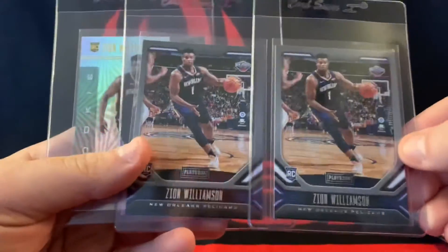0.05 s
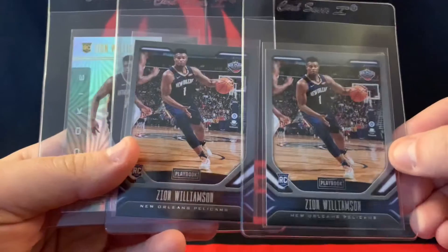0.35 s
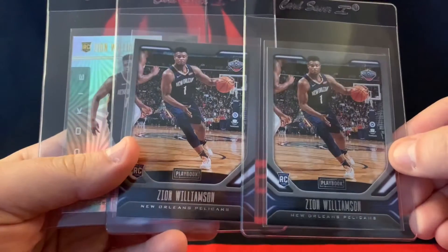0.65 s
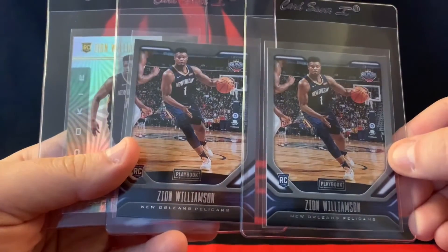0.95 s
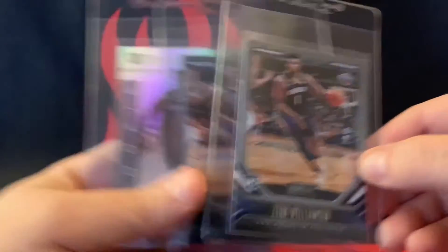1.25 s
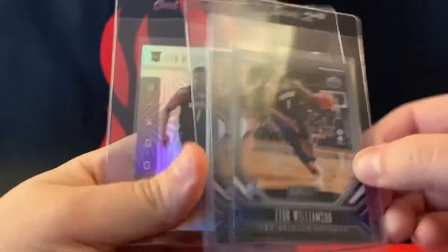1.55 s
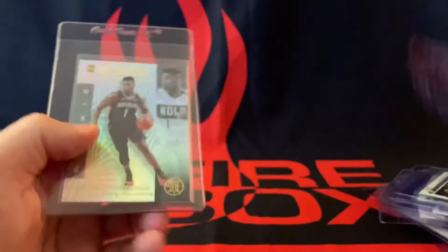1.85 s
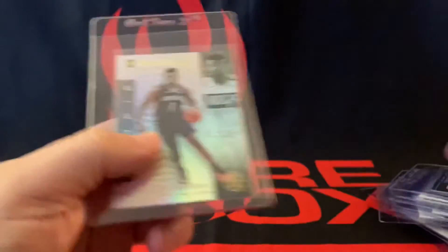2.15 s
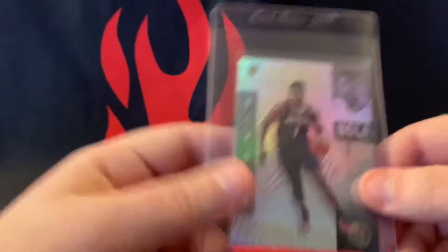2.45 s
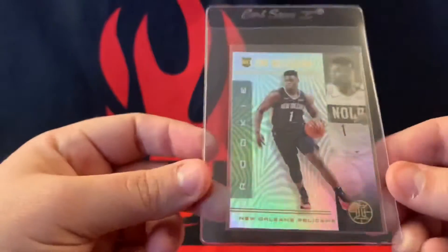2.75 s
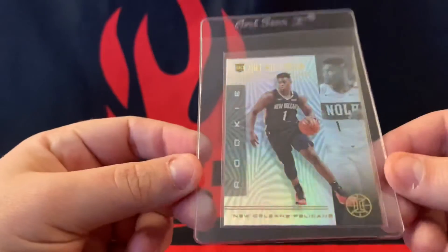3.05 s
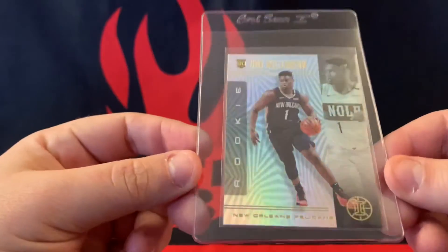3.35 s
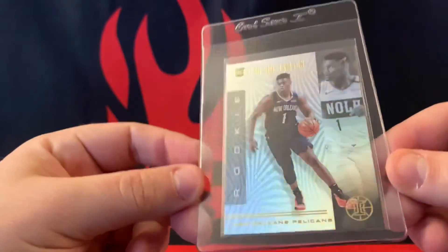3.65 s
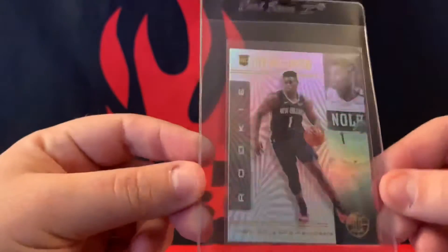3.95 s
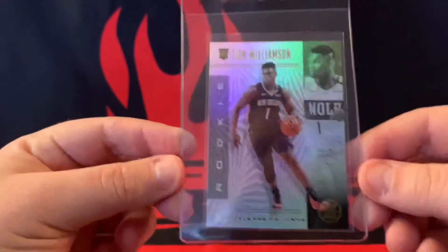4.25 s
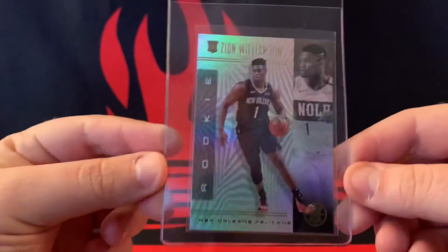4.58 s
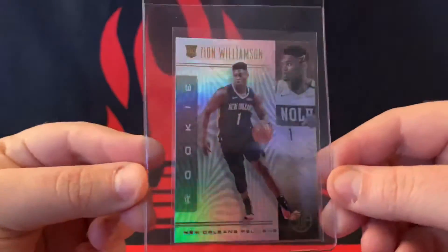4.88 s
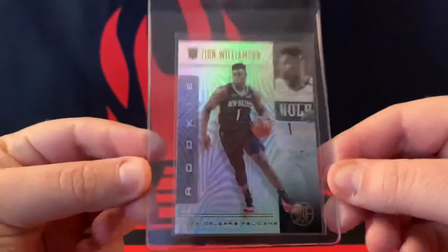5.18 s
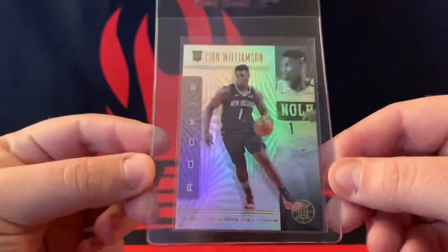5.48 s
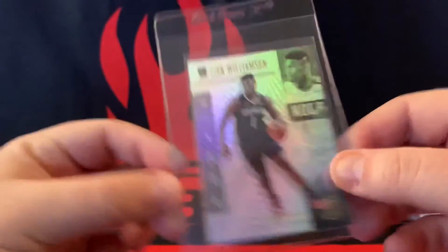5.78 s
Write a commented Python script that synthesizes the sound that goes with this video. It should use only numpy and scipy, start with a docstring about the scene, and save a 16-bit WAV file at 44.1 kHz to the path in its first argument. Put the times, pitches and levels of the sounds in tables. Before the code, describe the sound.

A steady low hum and fan rush fill a small room. Close up, plastic card sleeves rub and click against each other, with one sharp snap, a dry tap and a heavy, dull bump on the desk. The handling then grows quiet, leaving soft groans and rumbles of arms shifting on the desk that carries the microphone, and a last short cluster of plastic clicks.

```python
"""At a desk in a small room, bendy plastic card holders are slid apart, snapped free and turned over
just in front of a phone. The sleeves hiss as they rub, tick as their edges catch and knock as they
buckle; the spare ones are set down with a tap. Forearms bump, drag and creep on the desk that carries
the phone, making it thud, rumble and groan. A fan and mains hum fill the room throughout."""
import sys
import numpy as np
from scipy import signal
from scipy.fft import rfft, irfft
from scipy.io import wavfile
from scipy.ndimage import uniform_filter1d

SR = 44100
rng = np.random.default_rng(int(sys.argv[2]) if len(sys.argv) > 2 else 0)


def digitize_waveform(pressure):
    """Quantize a signal to 16-bit integers and store it at the path in sys.argv[1].

    Rows of a 2-D input are taken as channels; values are limited to [-1, 1].
    """
    field = np.atleast_2d(pressure).T
    bounded = np.clip(field, -1, 1)
    quanta = np.round(bounded * 32767).astype(np.int16)
    wavfile.write(sys.argv[1], SR, quanta)


N = 256662
TIME, FREQ = np.arange(N) / SR, np.fft.rfftfreq(N, 1 / SR)

# mains and fan tones: (pitch [Hz], level [dB], waver [0-1])
HUM_TONES = [(118.6, -59, 0.62), (200.6, -56.5, 0.95), (240.4, -50.5, 0.42), (324.5, -64.5, .8),
             (362.7, -65.5, 0.3), (407, -66, 0.4), (511.5, -73, 1), (592, -75.5, 0.8), (723.7, -75, 1),
             (808, -80.5, 0.7), (888, -82.5, 0.87), (1058, -78.5, 0.83), (1188, -84, 0.97)]
# the fan's rush, shared by both microphones and differing between them: (frequency [Hz], level [dB])
RUSH_SHARED_COLOUR = [(25, -33), (45, 5), (100, -6), (170, -4), (250, -3.5), (420, -9), (640, -16.5),
                      (900, -23), (1150, -21.5), (1700, -32.5), (2500, -37), (4200, -46.5), (7000, -56.5),
                      (12000, -52.5), (15500, -62.5)]
RUSH_SIDE_COLOUR = [(25, -28.5), (50, -4), (200, -7), (330, -2.5), (450, -7.5), (750, -3), (1200, -10.5),
                    (1700, -16.5), (2400, -24.5), (4200, -37.5), (7000, -42), (15500, -43.5)]
# the fan's whirr: (frequency [Hz], level [dB])
WHIRR_COLOUR = [(1800, -32.5), (2600, -7.5), (3000, -2.5), (3350, -8), (3550, -20), (3900, -16.5),
                (7000, -40)]
# a thin whistle on top of the whirr: (time [s], length [s], level [dB])
FAN_WHISTLES = [(2.5, 0.26, -73), (5.33, .32, -76)]

# forearms bumping the desk: (time [s], level [dB], contact time [s])
ARM_BUMPS = [(0.824, -33.5, 0.016), (1.834, -24, 0.012), (1.855, -27, 0.0069), (2.383, -17.5, 0.0075),
             (2.399, -16.5, 0.004), (2.425, -21.5, 0.0083), (2.916, -38.5, 0.0021), (2.992, -29, 0.0056),
             (3.023, -39.5, 0.0088), (3.612, -35, 0.0017), (4.147, -30.5, 0.00092), (4.42, -32, 0.011),
             (4.933, -33, 0.0051)]
# forearms leaning and dragging: (time [s], length [s], sway level [dB], drag level [dB])
ARM_LEANS = [(.82, 0.061, -34, -45), (1.365, 0.012, -33, -42), (1.835, 0.058, -29, -32.5),
             (2.04, 0.17, -44, -45), (2.392, 0.022, -23, -27.5), (2.47, 0.051, -26.5, -36.5),
             (2.565, 0.021, -50, -39.5), (2.69, 0.23, -48.5, -46), (3.02, 0.17, -35.5, -41),
             (3.605, 0.035, -35, -34.5), (4.23, 0.092, -31.5, -47.5), (4.42, 0.083, -32.5, -40.5),
             (4.9, 0.1, -32, -39.5), (5.15, 0.1, -32.5, -62), (5.53, 0.052, -36.5, -38),
             (5.69, 0.018, -48, -45)]
# modes (natural notes) of desk and phone stand, bumped or rocked: (pitch [Hz], level [dB], ring time [s])
DESK_MODES = [(51, -6, 0.18), (78, -1.5, 0.11), (116.9, -6.5, 0.25), (152.6, -9.5, 0.45),
              (203.3, -0.5, 0.16), (227.1, -1.5, 0.28), (301, -4.5, 0.065), (360.7, -6, 0.097),
              (393, -21, 0.071)]
SWAY_MODES = [(45.3, -6.5, 0.71), (74.4, -4.5, 0.084)]
# an arm dragging on the desk: (frequency [Hz], level [dB])
ARM_DRAG_COLOUR = [(60, -20.5), (100, -6.5), (120, 5), (140, -3.5), (165, 0), (190, -18), (260, -14),
                   (380, -18), (600, -35), (1500, -43), (6000, -77.5)]

# strokes of sleeve over sleeve: (time [s], length [s], hiss level [dB], treble tilt [dB per octave],
# rub and crackle level [dB], sleeve resonance [Hz], resonance boost [dB])
SLEEVE_STROKES = [(1.148, 0.069, -54, -4.5, -68, 9300, -5), (1.329, 0.016, -59, -16, -66, 7600, -2),
                  (1.45, 0.03, -64.5, -8, -61.5, 5900, 0), (1.549, .053, -58.5, -9.5, -61, 4650, 11),
                  (1.645, 0.11, -72.5, 12, -78, 7040, 0), (1.859, 0.051, -57, -6, -55.5, 10000, -6),
                  (2.09, 0.093, -63, 7, -65, 8800, -1), (2.189, 0.044, -82, -4, -69, 6700, 3),
                  (2.286, 0.081, -70, -3, -65.5, 15000, 10), (2.44, 0.029, -61, -4.5, -63.5, 9100, -5),
                  (2.594, 0.025, -65, -10, -67.5, 7000, 9), (2.768, 0.031, -67, -4, -68.5, 9200, -1),
                  (2.888, 0.044, -82, 3, -76, 10500, 10.5), (3.057, 0.031, -82, 2.5, -79, 10600, 7),
                  (3.589, .026, -82, 4, -68, 5030, 4), (5.699, .0061, -65, -9, -66, 6100, 3),
                  (5.772, .04, -80, -4, -70, 6000, 7)]
# sliding plastic, rubbing thumbs and catching scratches: (frequency [Hz], level [dB])
HISS_COLOUR = [(600, -21), (2500, -16), (4000, -10), (5500, -13), (6700, -6.5), (11200, 2), (12600, -2.5),
               (14800, -1), (16500, -4.5)]
THUMB_COLOUR = [(400, -10), (1300, -5), (2600, -4.5), (4500, -5), (9000, -25)]
CRACKLE_COLOUR = [(800, -14.5), (2300, 3.5), (4500, 2), (8000, -17), (15000, -5.5)]
# holder edges catching: (time [s], level [dB], scrape length [s], treble tilt [dB per octave],
# ring pitch [Hz], ring level relative to the tick [dB])
EDGE_TICKS = [(1.16, -51, .003, 9, 10000, -9), (1.233, -41.5, 0.00065, -16, 6570, -2),
              (1.243, -61, .001, -6, 5900, -6), (1.334, -55, .003, 3, 11000, -4),
              (1.338, -53, 0.01, 0, 8160, -8), (1.4904, -52, 0.0054, -9, 6000, -2.5),
              (1.497, -49, .002, 0, 9500, -17), (1.5582, -45, .0007, -2, 8200, 0),
              (1.56, -43.5, .0015, -9, 4900, -9), (1.589, -39, 0.00076, 4, 4700, 8.5),
              (1.591, -38.5, 0.0014, 8, 7200, -2.5), (1.7989, -29.5, .0007, -8, 11500, -16),
              (1.8499, -31, 0.00071, -8, 11600, -16), (1.8521, -25, .001, -15.5, 7000, -8),
              (1.854, -18, 0.0013, 2, 8700, -12), (1.879, -30.5, .0007, -1, 10600, -7),
              (1.905, -39.5, 0.0046, -5, 10170, -7), (1.916, -47, .0007, 0, 10900, -6),
              (1.926, -52, .0008, -1, 6800, -8), (2.066, -59, .0015, 0, 10400, -3),
              (2.143, -58, 0.0014, 3, 10600, -2), (2.277, -43.5, 0.00063, -14, 9900, -3),
              (2.2998, -46, .001, 0, 10400, -14), (2.3034, -36.5, .0012, -13, 11600, -17),
              (2.3066, -41, 0.0015, -11, 4400, -5), (2.427, -57, 0.0032, 0, 9100, -8),
              (4.131, -73.5, .004, -10, 3980, 5), (4.481, -71, 0.0028, -10, 4800, 3),
              (5.6498, -69, 0.0055, 0, 5900, -2.5), (5.705, -41, 0.0025, -7, 9700, -15),
              (5.709, -42, .0025, -10, 6200, -10), (5.752, -58, .002, -5, 8500, -6)]
# the scrape in each tick: (frequency [Hz], level [dB])
SCRAPE_COLOUR = [(500, -11.5), (1500, -16), (3000, -18.5), (4700, -14.5), (6000, -10.5), (7000, -8),
                 (10400, 1.5), (12500, 1), (15000, -1), (17000, -5)]
# a holder buckles, hardest as it springs free, and sounds lower in a looser grip:
# (time [s], level [dB], pitch [ratio])
BUCKLES = [(1.234, -51, 0.7), (1.852, -30, 0.99), (1.8548, -35.5, 0.857), (1.8803, -55, 0.88),
           (2.304, -48, .78), (5.705, -57.5, 0.67), (5.712, -51.5, .78)]
# a holder's broad sheet: (pitch [Hz], level [dB], ring time [s])
SHEET_MODES = [(643, -14.5, 0.052), (860, -8, .02), (1120, -12.5, 0.052), (1430, -2.5, .014),
               (1577, -2, 0.032), (1880, -13, .018), (2396, -9, .02), (3410, -18, .014)]
# the pile of holders: (pitch [Hz], level [dB], ring time [s])
PILE_MODES = [(2400, -1, 0.0067), (3140, 0, .009), (5000, -12, 0.0036), (6900, -10, .003),
              (8400, -11, 0.0054), (10600, -4, .003)]

# a forearm creeping along the desk: (time [s], length [s], level [dB])
ARM_CREEPS = [(2.915, 0.026, -34.5), (2.998, 0.049, -32), (3.1, 0.316, -40.5), (3.48, 0.043, -42)]
# the desk notes that it shakes: (pitch [Hz], level [dB], ring time [s])
CREEP_MODES = [(118.6, -7, 0.15), (166.8, 4.5, 0.17), (196.6, -10, 0.082), (271, -11, 0.046),
               (332, -15, 0.056), (370, -14.5, 0.053)]

# the way round the phone's body to the left microphone: (frequency [Hz], delay [s])
LEFT_MIC_DELAY = [(400, .000184), (1500, .000115), (3000, .000085), (4300, .000115), (6400, .000156),
                  (8300, .000181), (11000, .000184), (13300, .000188)]
# the body's shadow on that microphone: (frequency [Hz], left minus right [dB])
LEFT_MIC_SHADE = [(3500, -0.5), (5400, -9.5), (7000, -0.5)]
# the hollow behind each microphone opening resonates: (frequency [Hz], boost [dB])
MIC_RESONANCE = [(7400, 0), (8700, 5), (10200, 0)]


def undb(db):
    """Turn decibels into a factor to multiply by."""
    return 10 ** (np.asarray(db) / 20)


def unit(x):
    """Scale a sound so that its average strength (rms) is 1."""
    return x / np.sqrt(np.mean(x ** 2))


def steady(x, seconds):
    """Even out a sound so that its strength stays near 1 over each short stretch."""
    return x / np.sqrt(np.abs(uniform_filter1d(x ** 2, int(seconds * SR))) + 1e-12)


def colour(x, points):
    """Shape a sound's lows and highs along a curve of (frequency [Hz], level [dB]) points."""
    hz, db = np.transpose(points)
    gain = undb(np.interp(np.log(FREQ + 1), np.log(hz), db))
    # folding the cepstrum makes the filter ring after a click, never before it
    cepstrum = irfft(np.log(gain), N)
    cepstrum[1:N // 2] *= 2
    cepstrum[N // 2 + 1:] = 0
    return irfft(rfft(x) * np.exp(rfft(cepstrum)), N)


def brightness(hz, db_per_octave):
    """Gain that tips the treble up or down like a seesaw around 9 kHz."""
    return undb(db_per_octave * np.log2(np.clip(hz, 4500, 18000) / 9000))


def wander(rate_hz):
    """A smooth random wobble of about size 1."""
    return unit(irfft(rfft(rng.standard_normal(N)) / (1 + (FREQ / rate_hz) ** 4), N))


def grains(per_s, spread_db):
    """Random clicks, many small and a few large."""
    size = undb(spread_db * np.minimum(rng.exponential(size=N), 4))
    return rng.choice([-1, 1], N) * size * (rng.random(N) < per_s / SR)


def ring(modes, seconds):
    """A struck object: each note fades 60 dB in its ring time; neighbours swing opposite ways."""
    t = TIME[:int(seconds * SR)]
    return sum((-1) ** k * undb(db - 60 * t / ring_s) * np.sin(2 * np.pi * hz * t)
               for k, (hz, db, ring_s) in enumerate(modes))


def drive(force, response):
    """Play a force through something that rings or echoes."""
    return signal.fftconvolve(force, response)[:len(force)]


def add(track, start_s, sound):
    """Mix a sound into a track at the given time."""
    i = int(start_s * SR)
    track[i:i + len(sound)] += sound[:N - i]


def swells(rows, rise, slope_db_per_s, release_s, level_column=2):
    """Loudness curve: each row swells up to its time, drifts for its length, then dies away."""
    gain = np.zeros(N)
    for row in rows:
        at_s, length, db = row[0], row[1], row[level_column]
        attack_s = rise * length
        lead_s = min(6 * attack_s, at_s)
        t = TIME[:int((lead_s + length + 8 * release_s) * SR)] - lead_s
        shape = np.exp(np.minimum(t, 0) / attack_s - np.maximum(t - length, 0) / release_s)
        add(gain, at_s - lead_s, undb(db + slope_db_per_s * np.maximum(t, 0)) * shape)
    return gain


def hum(waver_hz=4, side_db=-17):
    """Motor and mains tones, stirred by the fan's air and a little different at each microphone."""
    shared, side = 0, 0
    for hz, db, waver in HUM_TONES:
        pure = np.exp(2j * np.pi * (hz * TIME + rng.random()))
        wobble = wander(waver_hz) + 1j * wander(waver_hz)
        tone = undb(db) * pure * (np.sqrt(2) + waver * wobble)
        shared, side = shared + tone.real, side + tone.imag
    return shared + undb(side_db) * np.array([side, -side])


def fan(shared_db=-51, side_db=-59, whirr_db=-80, flutter_db=4.1):
    """Moving air: an even rush, a fluttering whirr and a thin whistle that comes and goes."""
    shared = unit(colour(rng.standard_normal(N), RUSH_SHARED_COLOUR)) * undb(shared_db)
    side = unit(colour(rng.standard_normal(N), RUSH_SIDE_COLOUR)) * undb(side_db)
    whirr = np.array([unit(colour(noise, WHIRR_COLOUR)) for noise in rng.standard_normal((2, N))])
    whistle_note = ring([(3350, 0, .017)], seconds=.05)
    whistle = np.array([unit(drive(noise, whistle_note)) for noise in rng.standard_normal((2, N))])
    whirr *= undb(whirr_db + flutter_db * wander(rate_hz=22))
    whistle *= swells(FAN_WHISTLES, rise=.22, slope_db_per_s=-6.5, release_s=.07)
    return shared + np.array([side, -side]) + whirr + whistle


def arm_leans(sway_db=-3, drag_db=-6):
    """Leaning rocks the desk's lowest notes; a dragging arm sticks and slips, shaking higher ones."""
    sway = steady(drive(rng.standard_normal(N), ring(SWAY_MODES, .5)), seconds=.24)
    drag = steady(colour(rng.standard_normal(N), ARM_DRAG_COLOUR), seconds=.011)
    shape = dict(rise=.42, slope_db_per_s=-21, release_s=.047)
    sway *= swells(ARM_LEANS, **shape)
    drag *= swells(ARM_LEANS, **shape, level_column=3)
    return undb(sway_db) * sway + undb(drag_db) * drag


def arm_bumps():
    """Soft blows shake the desk; the longer the contact, the deeper the thud."""
    out, t, desk = np.zeros(N), TIME[:SR // 2], ring(DESK_MODES, .34)
    for at_s, db, contact_s in ARM_BUMPS:
        push = t * np.exp(-2 * np.pi * t / contact_s)
        thud = drive(push, desk)
        add(out, at_s, undb(db) * thud / np.abs(thud).max())
    return out


def sleeve_slides(judder_db=3, hiss_db=-1, thumb_db=-3.5, crackle_db=-7, width_octaves=.13):
    """Countless tiny slips of plastic on plastic blur into a hiss; thumbs rub and scratches crackle."""
    shape = dict(rise=.34, slope_db_per_s=-17, release_s=.032)
    slips = colour(grains(per_s=1300, spread_db=1.7), HISS_COLOUR)
    spectrum = rfft(slips * undb(judder_db * wander(rate_hz=90)))
    hiss = np.zeros(N)
    for at_s, length, db, tilt, _, hz, boost_db in SLEEVE_STROKES:
        # the free part of the sleeve resonates, at a different pitch for each grip
        resonance = undb(boost_db / (1 + (np.log2((FREQ + 1) / hz) / width_octaves) ** 2))
        stroke = unit(irfft(spectrum * resonance * brightness(FREQ, tilt), N))
        hiss += stroke * swells([(at_s, length, db)], **shape)
    thumbs = unit(colour(rng.standard_normal(N), THUMB_COLOUR))
    crackle = unit(colour(grains(per_s=150, spread_db=2), CRACKLE_COLOUR))
    rub = undb(thumb_db) * thumbs + undb(crackle_db) * crackle
    return undb(hiss_db) * hiss + rub * swells(SLEEVE_STROKES, **shape, level_column=4)


def edge_ticks(scrape_db=-1, rise=.65, ring_cycles=36):
    """One edge scrapes briefly over another; the soft plastic rings for only a few dozen cycles."""
    scrapes, ringing = np.zeros(N), np.zeros(N)
    t = TIME[:SR // 10] - .03  # zero is the peak of the tick
    tick_freq = np.fft.rfftfreq(len(t), 1 / SR)
    for at_s, db, length, tilt, hz, ring_db in EDGE_TICKS:
        shape = np.exp(np.minimum(t / rise, -t) / length)  # builds faster than it dies
        scrape = unit(rng.standard_normal(len(t)) * shape)
        edge = unit(drive(scrape, ring([(hz, 0, ring_cycles / hz)], .03)))
        tilted = irfft(rfft(scrape) * brightness(tick_freq, tilt))
        strength = undb(db) * np.sqrt(np.mean(shape ** 2))
        add(scrapes, at_s + t[0], strength * undb(scrape_db) * tilted)
        add(ringing, at_s + t[0], strength * undb(ring_db) * edge)
    return colour(scrapes, SCRAPE_COLOUR) + ringing


def sheet_buckles():
    """Each buckle rings a holder's broad sheet with a hollow knock."""
    out = np.zeros(N)
    for at_s, db, ratio in BUCKLES:
        knock = ring([(hz * ratio, mode_db, ring_s) for hz, mode_db, ring_s in SHEET_MODES], .09)
        add(out, at_s, undb(db) * knock / np.abs(knock).max())
    return out


def pile_tap(at_s=2.004, db=-46.5, contact_s=.00096):
    """The spare holders land on the pile with one dry tap."""
    out, t = np.zeros(N), TIME[:SR // 20]
    contact = rng.standard_normal(len(t)) * t * np.exp(-t / contact_s)
    tap = drive(contact, ring(PILE_MODES, .03))
    add(out, at_s, undb(db) * tap / np.abs(tap).max())
    return out


def desk_groan(db=-1.5):
    """The skin of a creeping arm sticks and slips in uneven jerks that shake the desk."""
    jerks = grains(per_s=140, spread_db=3)
    judder = steady(drive(jerks, ring(CREEP_MODES, .25)), seconds=.049)
    return undb(db) * judder * swells(ARM_CREEPS, rise=.14, slope_db_per_s=1, release_s=.018)


def microphones(x):
    """Sound reaches the right microphone first, the left later and shaded; both ring in the treble."""
    delay_s, shade_db, boost_db = (np.interp(FREQ, *np.transpose(points))
                                   for points in (LEFT_MIC_DELAY, LEFT_MIC_SHADE, MIC_RESONANCE))
    left = undb(boost_db + shade_db / 2) * np.exp(-2j * np.pi * FREQ * delay_s)
    right = undb(boost_db - shade_db / 2)
    return irfft(rfft(x) * np.array([left, right]), N)


def room(x, ring_s=.048, walls_db=-13, early_db=-9.5, early_s=.002):
    """Hands and desk top echo at once; the walls echo only faintly, as the holders are held close."""
    t = TIME[:SR // 3]
    early = rng.standard_normal(len(t)) * np.exp(-t / early_s) * (t > .0003)
    late = rng.standard_normal((2, len(t))) * undb(-60 * t / ring_s) * (t > .005)
    near = x + undb(early_db) * drive(x, early / np.linalg.norm(early))
    walls = np.array([drive(x, wall / np.linalg.norm(wall)) for wall in late])
    return microphones(near) + undb(walls_db) * walls


def scene():
    """The fan fills the background, thuds come through the phone stand, the plastic through the air."""
    background = hum() + fan()
    balance = undb([[-.6], [.6]])  # a little louder on the right
    thuds = microphones(arm_leans() + arm_bumps() + desk_groan()) * balance
    plastic = room(sleeve_slides() + edge_ticks() + sheet_buckles())
    return background + thuds + plastic + pile_tap()


def record(dry, bottom_hz=30, top_hz=15750):
    """The phone cuts the deepest bass and the highest treble."""
    bass_cut = signal.butter(4, bottom_hz, "highpass", fs=SR, output="sos")
    treble_cut = signal.ellip(8, .2, 70, top_hz, fs=SR, output="sos")
    return signal.sosfilt(treble_cut, signal.sosfilt(bass_cut, dry))


dry = scene()
out = record(dry)
digitize_waveform(out)
```